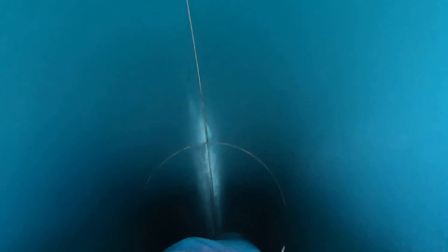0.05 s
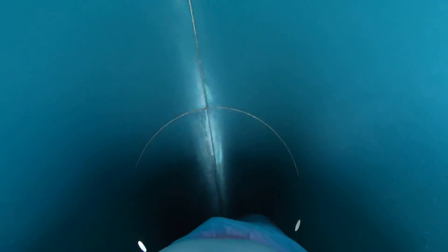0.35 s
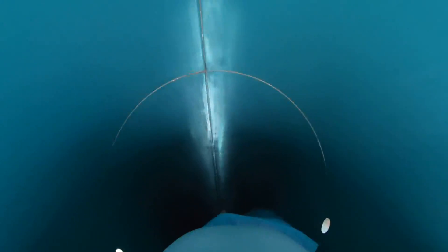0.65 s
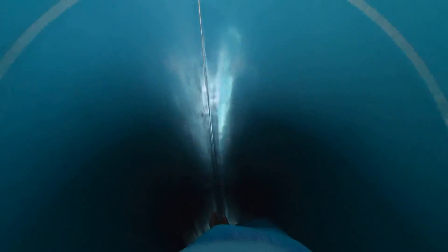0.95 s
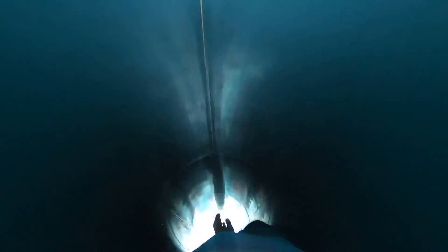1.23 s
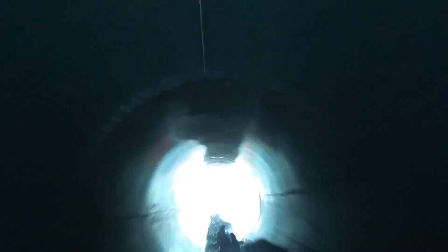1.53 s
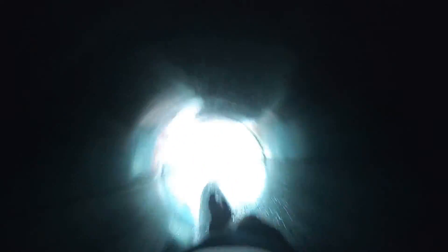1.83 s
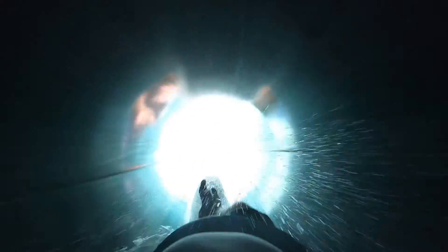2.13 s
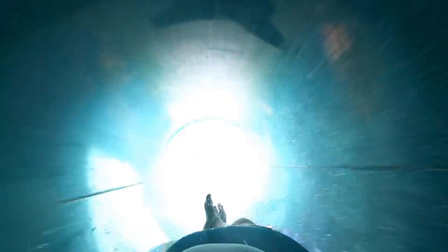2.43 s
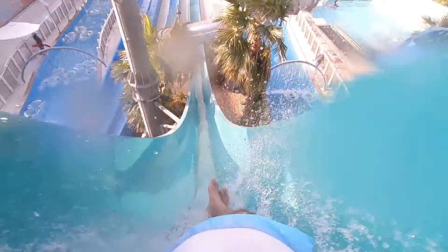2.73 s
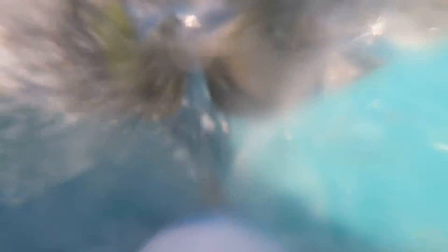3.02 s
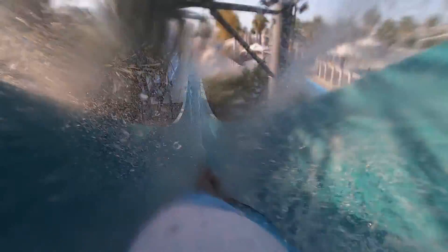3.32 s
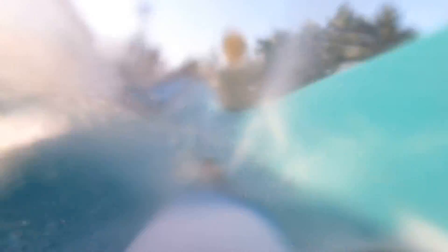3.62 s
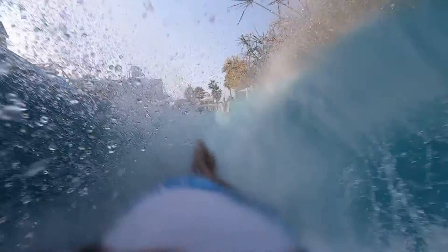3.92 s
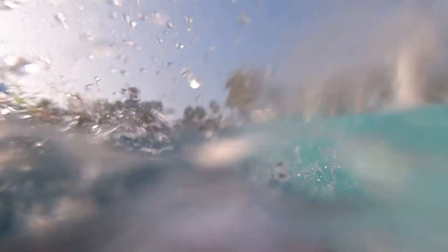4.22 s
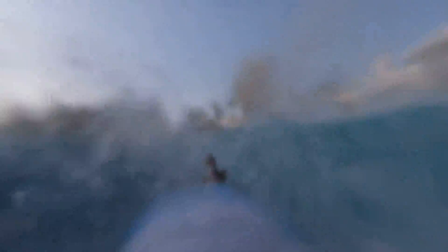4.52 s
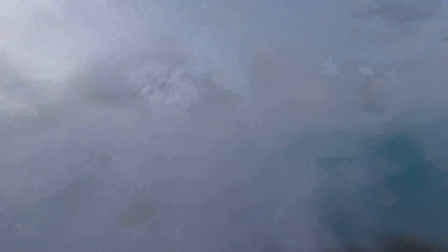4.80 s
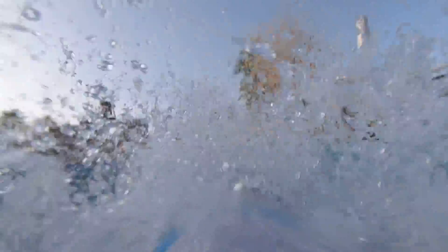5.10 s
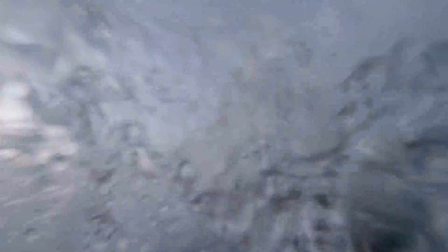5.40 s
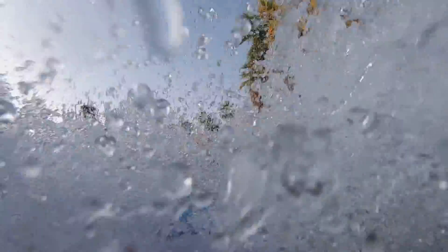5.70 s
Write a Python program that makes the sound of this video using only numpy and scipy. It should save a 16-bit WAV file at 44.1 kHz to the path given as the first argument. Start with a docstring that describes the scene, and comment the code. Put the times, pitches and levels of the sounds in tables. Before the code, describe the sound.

Heard from a waterproof camera carried down a waterslide, the ride starts with a resonant, gurgling rush of water and low bumps of a body on the tube wall. Out in the open run-out, gusty wind tears at the microphone, broken by wet slaps and rattling drops. The rider ploughs up a roaring wave and plunges into the pool, where foam fizzes and air pockets pop around the microphone.

```python
"""Water roars in a fibreglass tube slide, heard from a waterproof camera on the rider. The rushing
sheet rings the tube's resonances and gurgles, while the shell drums under the sliding body.
From the mouth on, wind tears at the two microphone ports and slugs of water slap over them.
At the end of the open run-out the body ploughs up a wall of spray and plunges into the pool,
where foam fizzes and bubbles burst round the ports."""
import sys
import numpy as np
from scipy import signal
from scipy.fft import rfft, irfft
from scipy.io import wavfile
from scipy.ndimage import uniform_filter1d

SR = 44100
rng = np.random.default_rng(int(sys.argv[2]) if len(sys.argv) > 2 else 0)


def dump_mix(stems):
    """Bounce the given channels to the path in sys.argv[1] as a 16-bit WAV at rate SR."""
    frames = np.atleast_2d(stems).T  # one column per channel
    limited = np.clip(frames, -1, 1)  # hard clip at full scale
    pcm = np.round(limited * 32767).astype(np.int16)
    wavfile.write(sys.argv[1], SR, pcm)


N = 253575
TIME = np.arange(N) / SR
FFT_SIZE = 2 ** 18
BINS_HZ = np.maximum(np.fft.rfftfreq(FFT_SIZE, 1 / SR), 1)
# the ride: the tube opens, water brakes the rider, the rider hits deep water, the camera goes under
MOUTH_S, BRAKE_S, PLUNGE_S, UNDER_S = 2.09, 4.95, 5.109, 5.473
PORT_LAG_S = .0001

# fader curve of the water sheet in the tube: time_s, level_db
SHEET_FADER = [(0.0, -30.5), (0.5, -27.3), (1.1, -26.5), (1.63, -27), (1.89, -36), (1.9, -49), (1.97, -32),
               (2.04, -34), (2.16, -41.5), (2.2, -43.5)]
# brief dropouts of the wind: centre_s, length_s, gain_db
WIND_LULLS = [(1.845, 0.014, -5), (1.925, 0.033, -19), (2.145, 0.022, -5), (2.203, 0.014, -12),
              (2.236, 0.0099, -17), (2.388, 0.02, -4.5), (2.44, .016, -6), (2.499, .012, -4),
              (2.527, 0.011, -6), (2.825, 0.028, -5), (3.168, 0.016, -6), (3.315, 0.032, -10),
              (3.49, .012, -6), (3.812, 0.011, -7), (3.878, 0.02, -8.5), (4.028, 0.015, -7),
              (4.385, .02, -6), (4.49, 0.03, -1), (4.65, .022, -4.5), (4.987, .014, -2), (5.508, .025, -2),
              (5.59, 0.018, 3)]
# slugs of water striking the ports: start_s, length_s, level_db
WATER_SLUGS = [(1.711, 0.007, -21.5), (1.75, .01, -17), (1.876, 0.023, -18.5), (2.026, 0.018, -17),
               (2.074, 0.016, -18.5), (2.158, 0.013, -13.5), (2.215, 0.0092, -11.5), (2.242, 0.0064, -15),
               (2.284, 0.018, -13), (2.318, 0.012, -14.5), (2.346, .012, -15.5), (2.45, 0.019, -13),
               (2.481, 0.0053, -11), (2.506, .012, -19), (2.533, 0.019, -16.5), (2.604, 0.02, -15),
               (2.769, 0.015, -18), (2.837, 0.0094, -20), (2.905, 0.0087, -14.5), (3.144, 0.007, -16),
               (3.351, 0.012, -20.5), (3.787, 0.014, -13.5), (3.886, 0.0099, -15.5), (3.928, .015, -17.5),
               (4.04, .008, -19), (4.179, 0.016, -17.5), (4.517, 0.0052, -14), (4.803, 0.0093, -14.5),
               (4.851, 0.021, -17.5), (4.951, 0.011, -16.5), (4.999, .012, -17), (5.061, 0.02, -20),
               (5.474, 0.0035, -13.5)]


def tube_rush():
    """The water sheet hisses and sets the tube's air ringing; pitch and echoes shift as the rider sways."""
    # tone of the rushing sheet: freq_hz, gain_db
    sheet_eq = [(200, -1), (420, -13), (600, -3), (900, -1), (1500, -2), (2300, -4), (3300, -6),
                (5000, -11), (6000, -9), (7100, -7), (8200, -10.5), (10500, -22.5)]
    # cross resonances of the tube's air: pitch_hz, width_hz, boost_db
    air_modes = [(275, 29, -2), (528, 46, 9.5), (744, 103, 5), (1124, 81, 0.5)]
    # reflections round the tube wall: delay_s, gain
    wall_echoes = [(.0047, 0.15), (.0083, 0.25), (0.0132, 0.3)]
    resonance = sum(from_db(db) ** 2 / (1 + ((BINS_HZ - hz) / (width / 2)) ** 2) ** 2
                    for hz, width, db in air_modes)
    tone = eq_curve(sheet_eq) * np.sqrt(1 + resonance)
    rush = water(tone, drops_per_s=14000, spread_db=1.5, surge_db=0.7, patchy_db=1.0)
    swayed_time = TIME + np.cumsum(.012 * drift(2.5)) / SR  # detunes by about 1.2 %
    rush = np.array([np.interp(abs(swayed_time), TIME, port) for port in rush])
    echoes = 0
    for delay_s, gain in wall_echoes:
        echo_time = TIME - delay_s * (1 + 0.062 * drift(0.761))
        echoes = echoes + gain * np.array([np.interp(echo_time, TIME, port) for port in rush])
    return from_db(5.5) * fader(SHEET_FADER) * unit_rms(rush + echoes)


def tube_swells():
    """Turbulent water feeds single resonances, which flutter and glide as the air space changes."""
    # resonances swelling as the rider passes: centre_s, length_s, pitch_hz, glide_hz_per_s,
    # width_hz, level_db
    resonances = [(0.133, 0.081, 1330, -900, 320, -26.5), (0.15, 0.083, 624.6, -4, 570, -24),
                  (0.206, 0.104, 270, -1, 28, -32), (.55, 0.25, 277.7, 90.5, 16, -28.5),
                  (0.752, 0.1, 268, -60, 14, -27.5), (0.434, 0.039, 815, -1, 70, -28),
                  (0.501, 0.2, 703, 60, 61, -31), (.58, 0.19, 519, -150, 59, -31),
                  (.58, 0.037, 591, -600, 39, -26), (0.833, 0.027, 1360, -1500, 84, -25.5),
                  (.86, 0.2, 516.6, -100, 45, -31), (0.902, 0.028, 916, -1500, 140, -24),
                  (1.05, 0.28, 751.5, 60.5, 56, -31.5), (1.111, 0.17, 915, -300, 120, -29.5),
                  (1.187, 0.11, 525, 80.5, 19, -28.5), (1.348, 0.045, 543, 0.5, 25, -29),
                  (1.498, 0.044, 1025, 900.5, 46, -29), (1.518, 0.034, 1347, 900.5, 47, -28)]
    out = 0
    for centre_s, length_s, hz, glide, width, db in resonances:
        phase = 2 * np.pi * np.cumsum(hz + glide * (TIME - centre_s)) / SR
        flutter = drift(width * 0.65) + 1j * drift(width * 0.64)
        flutter = flutter / (abs(flutter) + .1) ** .75  # compress its level swings
        note = unit_rms(flutter.real * np.cos(phase) + flutter.imag * np.sin(phase))
        out = out + from_db(db) * swell(centre_s, length_s) * note
    return from_db(-2.5) * out


def wind_buffeting():
    """Each port feels its own low lumps of pressure; the windward right port also flutters higher up."""
    # tone of the pressure lumps: freq_hz, gain_db
    buffet_eq = [(20, -9.5), (35, 0), (70, 1.5), (130, -0.5), (220, -7), (400, -17.5), (800, -27),
                 (1600, -56.5)]
    # the low end swells and eases along the run-out: centre_s, length_s, gain_db
    low_swells = [(2.15, .3, 1), (3.0, .7, -1), (4.35, .3, -1), (5.02, 0.11, 1.5)]
    pressure, exposure = port_pressure(), shielding()
    lumps = steady(filtered(rng.standard_normal((2, N)), eq_curve(buffet_eq)), window=4000)
    lumps = lumps * exposure ** 0.36 * accents(low_swells)
    flutter = band_pass(rng.standard_normal(N), 135, 424) * from_db(6.2 * drift(50))
    flutter = steady(flutter, window=2000) * exposure
    return from_db(-1) * pressure * lumps + from_db(-6) * pressure[1] * flutter * [[-.15], [1]]


def port_pressure():
    """Buffeting envelopes, left and right: airstream plus single shoves. The right port drowns first."""
    # shoves of air, later water: centre_s, length_s, left_db, right_db
    shoves = [(.01, 0.1, -29, -19), (1.386, 0.011, -25, -16), (1.45, .08, -28, -37),
              (1.638, 0.013, -16, -17), (1.722, 0.01, -15, -12), (1.797, 0.08, -22, -40),
              (1.885, .014, -21, -16), (2.18, 0.026, -23, -21), (3.787, 0.22, -31, -30),
              (5.067, 0.035, -41, -24), (5.536, 0.015, -13.5, -23), (5.618, .024, -9, -28),
              (5.68, 0.049, -16, -24)]
    left = from_db(-16) * plateau(1.98, BRAKE_S, rise_db_per_s=21.5, fall_db_per_s=18.5)
    right = from_db(-14) * plateau(1.98, BRAKE_S, rise_db_per_s=21.5, fall_db_per_s=73)
    airstream = np.array([left, right]) * accents(WIND_LULLS) ** 0.48  # lulls at about half depth
    return airstream + sum(from_db([[left_db], [right_db]]) * swell(centre_s, length_s)
                           for centre_s, length_s, left_db, right_db in shoves)


def wind_eddies(churn_db, brightening, flicker_db):
    """Turbulence churns and tears off for instants; stronger wind makes finer, brighter eddies."""
    # tone of the eddies: freq_hz, gain_db
    eddy_eq = [(130, 6.5), (250, 9.5), (400, 6), (600, 8), (850, 4), (1200, -9), (1800, -24.5), (2800, -52),
               (4500, -44), (8000, -56)]
    nominal = from_db(-21)
    churn = steady(from_db(-churn_db * np.logaddexp(0, 2 * drift(86))), window=2500)
    strength = churn * wind_strength() * shielding() / nominal
    white = rng.standard_normal((2, N))
    edges_hz = np.geomspace(110, 9000, 12)
    bed = driven = 0
    for k, hz in enumerate(np.sqrt(edges_hz[1:] * edges_hz[:-1])):
        gain = from_db(at_hz(eddy_eq, hz) + flicker_db * drift(48))
        noise = gain * band_pass(white[k % 2], edges_hz[k], edges_hz[k + 1])
        steepness = np.clip(1 + brightening * np.log2(hz / 1000), .4, 1.5)
        bed = bed + noise
        driven = driven + noise * strength ** steepness
    bed_rms = np.sqrt(uniform_filter1d(bed ** 2, size=800))
    return from_db(3) * nominal * at_ports(driven / bed_rms)


def wind_strength():
    """Flow at the ports: a wavering plateau with gusts and lulls, then the weaker wash of the pool."""
    # the strongest gusts: centre_s, length_s, boost_db
    gusts = [(1.812, 0.027, 15), (1.882, 0.023, 12), (2.285, 0.087, 4.5), (2.63, 0.063, 4),
             (2.945, .05, 4.5), (3.01, .022, 2.5), (3.09, 0.045, 4), (3.205, 0.025, 4.5), (3.46, 0.03, 2),
             (3.59, 0.051, 5.5), (3.73, 0.045, 1.5), (3.99, 0.13, 4.5), (4.12, .05, 3.5), (4.28, 0.075, 4),
             (4.42, 0.033, 3.5), (4.595, 0.025, 3.5), (4.73, 0.04, 3.5), (4.92, 0.08, 0.5)]
    air = from_db(-21.5) * plateau(MOUTH_S, BRAKE_S, rise_db_per_s=33, fall_db_per_s=72)
    wash = from_db(-34) * plateau(PLUNGE_S, TIME[-1], rise_db_per_s=148)
    waver = from_db(1.03 * drift(7.9))
    return np.hypot(air, wash) * accents(gusts) * accents(WIND_LULLS) * waver


def shielding(lead_s=0.0069, duck_db=-4):
    """Gain that ducks the wind: each slug of water shields the ports just before it lands."""
    covers = [plateau(start_s - lead_s, start_s, rise_db_per_s=2000, fall_db_per_s=1997.5)
              for start_s, _, _ in WATER_SLUGS]
    return from_db(duck_db * np.max(covers, axis=0))


def slaps():
    """A slug of water lands abruptly, churns over the ports and is blown off."""
    # tone of a slap: freq_hz, gain_db
    slap_eq = [(130, 3.5), (300, 8.5), (600, 9.5), (950, 1), (1400, -10), (2200, -26), (3500, -34),
               (6000, -37.5), (9000, -52)]
    force = sum(from_db(db) * plateau(s, s + length_s, rise_db_per_s=12001, fall_db_per_s=1997.5)
                for s, length_s, db in WATER_SLUGS)
    churn = steady(filtered(rng.standard_normal(N), eq_curve(slap_eq)), window=350)
    return at_ports(force * churn)


def spray():
    """Fine spray thickens along the run-out and is cut off as the camera goes under."""
    # tone of the spray: freq_hz, gain_db
    spray_eq = [(500, 4), (1500, 4), (3300, 0), (4800, -2.5), (5900, 1), (7000, 1.5), (8200, -2),
                (10500, -25.5)]
    # fans of spray and the gaps between them: centre_s, length_s, gain_db
    fans = [(2.83, .06, -3), (3.3, 0.039, -6), (3.42, 0.27, 7.5), (3.75, 0.047, 4.5), (3.84, 0.05, -5),
            (4.25, 0.35, 5), (4.54, 0.068, -0.5), (4.69, 0.093, 8), (5.08, 0.055, 12.5), (5.355, .09, 11.5),
            (5.457, 0.018, 3)]
    thickness = from_db(-42) * plateau(PLUNGE_S, UNDER_S, rise_db_per_s=3.5, fall_db_per_s=2500)
    hiss = water(eq_curve(spray_eq), drops_per_s=3700, spread_db=2.0, surge_db=1.63, patchy_db=0.8)
    return thickness * accents(fans) * hiss


def bow_wave():
    """The body ploughs up a heavy wave, with a smaller one running ahead of it."""
    # tone of the wave: freq_hz, gain_db
    wave_eq = [(25, -7), (60, 4), (150, 1), (300, -4), (550, -9), (900, -9), (1500, -13.5), (2500, -18.5),
               (4500, -27), (5600, -23), (6700, -23.5), (7800, -30.5), (10500, -46.5)]
    # the wave surges and thins: centre_s, length_s, gain_db
    surges = [(5.2, .1, 0.5), (5.36, .14, -0.5), (5.462, 0.018, 0)]
    push = from_db(-20) * plateau(PLUNGE_S, UNDER_S, rise_db_per_s=148, fall_db_per_s=2500)
    forerunner = from_db(-27.5) * swell(centre_s=4.91, length_s=0.17)
    roar = water(eq_curve(wave_eq), drops_per_s=7000, spread_db=3, surge_db=-0.1, patchy_db=1.5)
    return (push * accents(surges) + forerunner) * roar


def slide_rumble():
    """The shell drums under the sliding body until the tube flattens out, alike at both ports."""
    # tone of the shell: freq_hz, gain_db
    shell_eq = [(20, -26), (35, 2.5), (60, -1), (95, -3.5), (140, -7), (200, -13.5), (350, -23), (700, -42)]
    # the rumble eases between bumps: centre_s, length_s, gain_db
    dips = [(.055, 0.038, -5), (.24, .04, 0.5), (.375, 0.022, -1), (.78, .02, -5), (1.015, .025, -3),
            (1.12, .025, -4), (1.2, .03, -4), (1.295, 0.073, -2)]
    rumble = steady(filtered(rng.standard_normal(N), eq_curve(shell_eq)))
    return from_db(-24.5) * plateau(0, 1.66, fall_db_per_s=144) * accents(dips) * rumble


def bumps():
    """The rider's weight bumps over the wall and makes the shell throb for a few low cycles."""
    # throbs of the shell: centre_s, length_s, pitch_hz, level_db
    throbs = [(.125, 0.044, 84, -20), (.187, 0.024, 90, -14.5), (.308, 0.047, 83, -18.5),
              (.63, .06, 88, -24.5), (0.81, .03, 60, -19), (0.907, .04, 62, -19), (.972, .03, 65, -22),
              (1.062, 0.059, 57, -19.5), (1.16, 0.034, 55, -24), (1.36, .04, 45, -23), (1.47, .04, 48, -21),
              (1.547, .04, 38, -22)]
    out = 0
    for centre_s, length_s, hz, db in throbs:
        note = np.sqrt(2) * np.sin(2 * np.pi * (hz * TIME + rng.random()))
        out = out + from_db(db) * swell(centre_s, length_s) * note
    return out


def pops():
    """Port slaps, ticking drops and popping air pockets: each swells within half a cycle and rings out."""
    # single pops and ticks: start_s, pitch_hz, t60_s, left_db, right_db
    hits = [(0.234, 1456, 0.079, -34, -20), (1.888, 172, 0.017, -17, -5), (1.044, 6500, 0.0033, -11.5, -9),
            (2.4625, 3400, .002, -24, -17), (3.201, 4500, 0.00072, -21, -12),
            (3.257, 6000, 0.0011, -20, -29), (3.894, 7500, 0.0015, -34, -36),
            (5.174, 3000, 0.0039, -21, -29), (5.4737, 520, .006, -3, -13), (5.476, 70, 0.054, -4.5, -26),
            (5.4965, 3000, 0.0032, -9.5, -11), (5.4967, 4300, 0.0034, -9, -17),
            (5.528, 1210, 0.009, -19, -20), (5.569, 213, 0.0084, -23, 6), (5.57, 1900, 0.0018, -14, -11),
            (5.619, 1400, .008, -17, -18), (5.633, 4800, .003, -18, -9), (5.639, 1495, .006, -13, -15),
            (5.641, 3100, .003, -15, -12), (5.668, 260, .01, -4, -20), (5.692, 131, 0.013, 8, -26),
            (5.698, 45, 0.063, -3, -30), (5.694, 6000, 0.0014, -13, -16)]
    out = np.zeros((2, N))
    for start_s, hz, t60_s, left_db, right_db in hits:
        age = np.clip(TIME - start_s, 0, 2 * t60_s)
        envelope = from_db(-60 * age / t60_s) * (1 - np.exp(-4 * hz * age))
        out += from_db([[left_db], [right_db]]) * envelope * np.sin(2 * np.pi * hz * age)
    return from_db(3) * out


def spatter():
    """Sheets of drops rattle briefly on the housing; the left side is late and inverted."""
    # sheets hitting the housing: centre_s, length_s, level_db
    sheets = [(2.012, 0.11, -21.5), (2.145, 0.02, -21), (2.274, 0.019, -28), (2.325, .006, -27),
              (2.35, .006, -32), (2.461, 0.0058, -17.5), (2.475, 0.0053, -30), (2.546, 0.0089, -25),
              (2.6, .007, -26), (2.941, 0.022, -24.5), (3.006, .008, -25.5), (3.096, 0.014, -19),
              (3.148, 0.005, -24.5), (3.201, 0.024, -24.5), (3.261, .006, -29), (3.626, 0.013, -22.5),
              (3.903, 0.0053, -35), (3.959, 0.088, -25), (4.038, 0.0087, -22), (4.182, 0.085, -27.5),
              (4.28, 0.054, -26), (4.38, 0.038, -24.5), (4.942, 0.05, -21), (5.61, .01, -22),
              (5.641, 0.0072, -20), (5.67, .014, -31), (5.688, 0.018, -28), (5.735, 0.01, -24)]
    # tone of the drops: freq_hz, gain_db
    drop_eq = [(350, 8.5), (900, 13), (1600, 5.5), (3200, -8.5), (5000, -21.5), (9000, -39.5)]
    envelope = sum(from_db(db) * swell(centre_s, length_s) for centre_s, length_s, db in sheets)
    drops = filtered(droplets(per_s=1300, spread_db=4), eq_curve(drop_eq))
    right = envelope * steady(drops, window=500)
    return np.array([-np.interp(TIME - PORT_LAG_S, TIME, right), right])


def foam():
    """Foam closes over the camera and fizzes at the right port, while the drowned left one is dull."""
    # tone of the foam: freq_hz, gain_db
    foam_eq = [(300, -15), (700, 1), (1400, 5), (2200, -4.5), (3600, -2), (5000, 4), (6000, 7.5),
               (7200, -6), (8500, -8), (10500, -28)]
    # bursts of fizz: centre_s, length_s, boost_db
    bursts = [(5.555, 0.027, 5.7), (5.63, 0.028, 7)]
    envelope = from_db(-29) * plateau(5.615, TIME[-1], rise_db_per_s=95) * accents(bursts)
    fizz = water(eq_curve(foam_eq), drops_per_s=5000, spread_db=3, surge_db=-0.1, patchy_db=3)
    left, right = envelope * fizz
    muffle = 1 / np.hypot(1, (BINS_HZ / 4000) ** 5)
    return np.array([filtered(left, muffle), right])


def gurgles(per_s=64, low_hz=652, high_hz=1690, ring_cycles=49):
    """Air pockets collapse at random under the rider in the tube, each a short note that rises a little."""
    out = np.zeros((2, N))
    for when, pitch, softness, pan in rng.random((int(per_s * MOUTH_S), 4)):
        hz = low_hz * (high_hz / low_hz) ** pitch
        cycles = hz * TIME[:int(ring_cycles / hz * SR)]
        life = cycles / ring_cycles
        envelope = from_db(-12 * softness - 60 * life) * (1 - np.exp(-cycles / 4))
        note = envelope * np.sin(2 * np.pi * cycles * (1 + 0.083 * life))
        start = int(when * MOUTH_S * SR)
        out[:, start:start + len(note)] += np.sqrt([[pan], [1 - pan]]) * note
    return from_db(-9) * fader(SHEET_FADER) * out / np.std(out[:, TIME < MOUTH_S])


def bubbling():
    """Under water, trapped air breaks into a patter of short mid-pitched bubbles right at the ports."""
    # tone of the bubbles: freq_hz, gain_db
    bubble_eq = [(700, -10), (1350, 3), (2000, -6), (3200, -15)]
    patter = filtered(droplets(per_s=900, spread_db=2.5), eq_curve(bubble_eq))
    envelope = from_db(-32) * plateau(5.565, TIME[-1], rise_db_per_s=200)
    return at_ports(envelope * steady(patter, window=2500))


def water(tone, drops_per_s, spread_db, surge_db, patchy_db):
    """Countless bursting drops heard at two ports; the whole surges, and each octave also on its own."""
    # left-right likeness of the water: freq_hz, correlation
    likeness = [(100, 0.96), (280, 0.74), (400, -0.029), (540, 0.94), (800, -0.064), (1300, -0.019),
                (2200, 0.29), (3600, 0.49), (4600, 0.35), (5600, -0.29), (10000, 0.036)]
    # stereo tilt, as the right port rings in the treble: freq_hz, left_minus_right_db
    balance = [(300, 2), (550, -1), (1500, -1), (3800, 0.5), (5500, -4.5), (7000, -8), (8500, 2),
               (10000, 0.5)]
    mid = rfft(droplets(drops_per_s, spread_db), FFT_SIZE)
    side = rfft(droplets(drops_per_s, spread_db), FFT_SIZE)
    alike = at_hz(likeness, BINS_HZ)
    polarity = np.array([[1], [-1]])
    spectrum = np.sqrt(1 + alike) * mid + polarity * np.sqrt(1 - alike) * side
    spectrum = spectrum * tone * from_db(polarity * at_hz(balance, BINS_HZ) / 2)
    octave = np.clip(np.log2(BINS_HZ / 500), 0, 4)
    out = 0
    for k in range(5):
        share = np.maximum(1 - abs(octave - k), 0)
        out = out + irfft(spectrum * share)[:, :N] * from_db(patchy_db * drift(14.5))
    return unit_rms(out * from_db(surge_db * drift(23)))


def droplets(per_s, spread_db):
    """Random tiny impacts of unequal size."""
    sizes = from_db(spread_db * np.minimum(rng.exponential(1, N), 4)) * rng.choice([-1, 1], N)
    return unit_rms(sizes * (rng.random(N) < per_s / SR))


def at_ports(right):
    """Close-set ports are subtracted for stereo: a push on the right is inverted, late and thin at left."""
    thin = right - 0.63 * filtered(right, 1 / (1 + (BINS_HZ / 600) ** 4))
    return np.array([-np.interp(TIME - PORT_LAG_S, TIME, thin), right])


def fader(points, fade_s=0.11):
    """Gain through points of (time_s, level_db), dying away outside their span."""
    times, levels_db = np.transpose(points)
    outside_s = np.maximum(np.maximum(times[0] - TIME, TIME - times[-1]), 0)
    return from_db(np.interp(TIME, times, levels_db)) * np.exp(-np.minimum(outside_s / fade_s, 20))


def plateau(start_s, end_s, rise_db_per_s=0, fall_db_per_s=0):
    """Gain that reaches 1 at the start, holds, and falls after the end."""
    before_db = rise_db_per_s * np.maximum(start_s - TIME, 0)
    after_db = fall_db_per_s * np.maximum(TIME - end_s, 0)
    return from_db(-np.minimum(before_db + after_db, 120))


def swell(centre_s, length_s):
    """A bell-shaped rise and fall."""
    return np.exp(-np.minimum(((TIME - centre_s) / (length_s / 2)) ** 2, 50) / 2)


def accents(rows):
    """Gain lifted or lowered by passing swells."""
    return from_db(sum(db * swell(centre_s, length_s) for centre_s, length_s, db in rows))


def drift(per_s):
    """Smooth random modulation of unit spread that changes about per_s times a second."""
    pole = np.exp(-40 * np.pi * per_s / SR)
    white = rng.standard_normal(N // 20 + 4002)  # one value every 20 samples
    slow = signal.lfilter([1], [1, -2 * pole, pole * pole], white)[4000:]
    return np.interp(np.arange(N) / 20, np.arange(len(slow)), unit_rms(slow))


def steady(x, window=7000):
    """Level out swings slower than the window (in samples), so that only quick lumps remain."""
    return x / np.sqrt(uniform_filter1d(x ** 2, size=window) + 1e-12)


def eq_curve(points):
    """Gain per frequency from (freq_hz, gain_db), rolling off steeply beyond the ends."""
    low_cut = np.hypot(1, (points[0][0] / BINS_HZ) ** 3)
    high_cut = np.hypot(1, (BINS_HZ / points[-1][0] / 2) ** 3)
    return from_db(at_hz(points, BINS_HZ)) / low_cut / high_cut


def at_hz(points, hz):
    """Read a table on a log-frequency axis."""
    freqs, values = np.transpose(points)
    return np.interp(np.log(hz), np.log(freqs), values)


def filtered(x, gain):
    """Filter by a gain per frequency."""
    return irfft(rfft(x, FFT_SIZE) * gain)[..., :N]


def band_pass(x, low_hz, high_hz):
    """Gentle band-pass."""
    return signal.sosfilt(signal.butter(2, [low_hz, high_hz], "band", fs=SR, output="sos"), x)


def unit_rms(x):
    """Scale to unit power."""
    return x / np.sqrt(np.mean(x ** 2) + 1e-20)


def from_db(db):
    """Decibels to gain."""
    return 10 ** (np.asarray(db) / 20)


def scene():
    """Wind, tube, splashes and pool, mixed at the two ports."""
    wind = wind_buffeting() + wind_eddies(churn_db=3.5, brightening=0.18, flicker_db=1.35)
    tube = tube_rush() + tube_swells() + gurgles() + slide_rumble() + bumps()
    splashes = slaps() + spatter()
    run_out = (spray() + bow_wave()) * from_db([[-1], [1]])  # leans to the right
    return tube + wind + splashes + run_out + foam() + pops() + bubbling()


def record(dry):
    """Soft saturation rounds the peaks under a ceiling, and a steep low-pass cuts the top."""
    ceiling, cutoff_hz = .95, 10550
    rounded = 1.43 * np.tanh(dry / 1.401)
    limited = rounded / (1 + (rounded / ceiling) ** 12) ** (1 / 12)
    return signal.sosfilt(signal.ellip(12, .2, 90, cutoff_hz, fs=SR, output="sos"), limited)


dry = scene()
out = record(dry)
dump_mix(out)
```